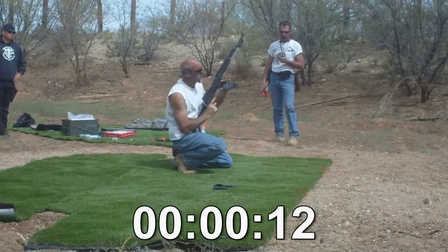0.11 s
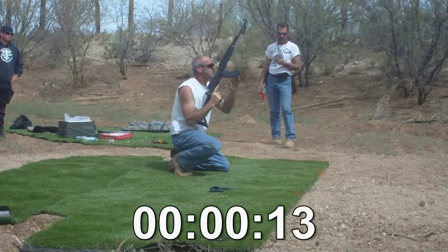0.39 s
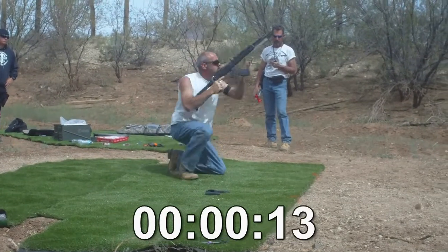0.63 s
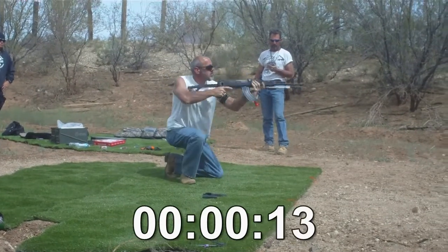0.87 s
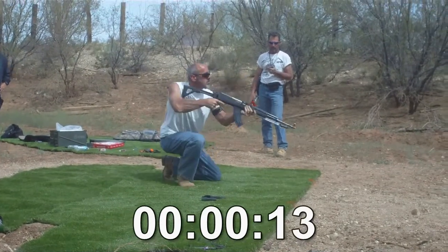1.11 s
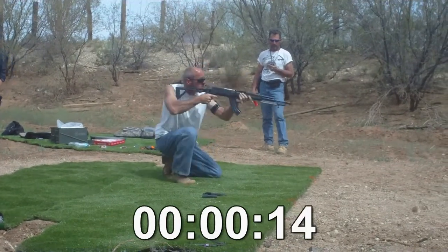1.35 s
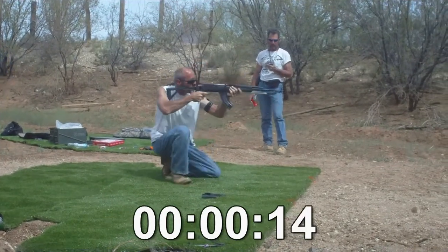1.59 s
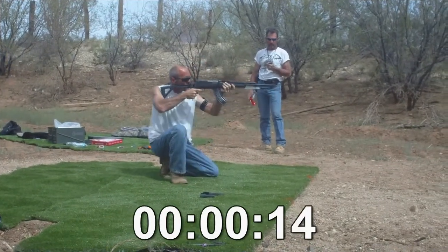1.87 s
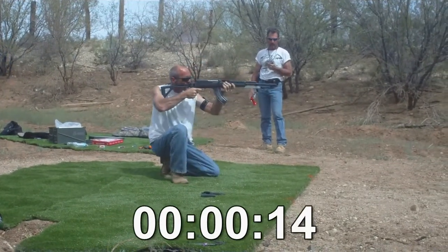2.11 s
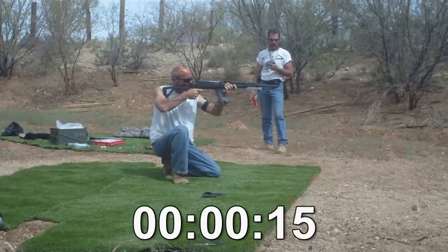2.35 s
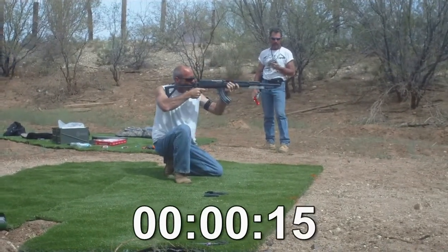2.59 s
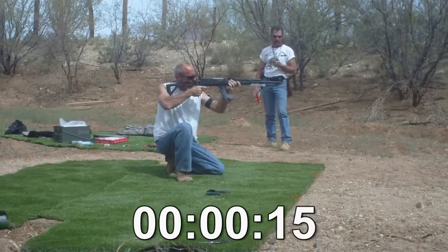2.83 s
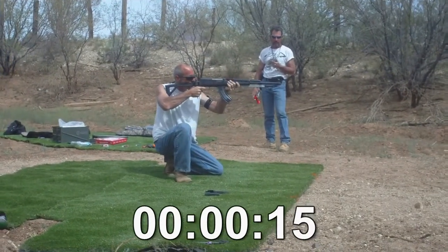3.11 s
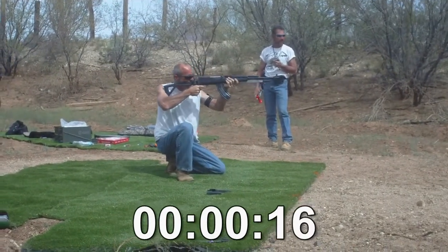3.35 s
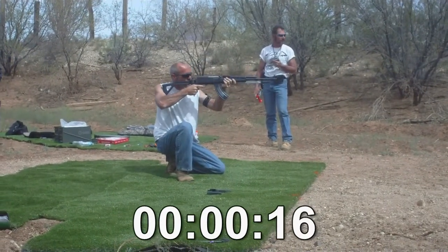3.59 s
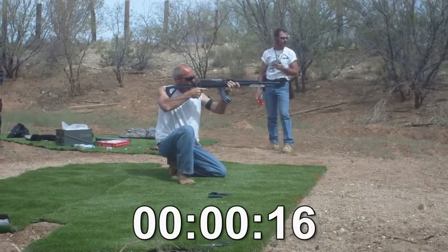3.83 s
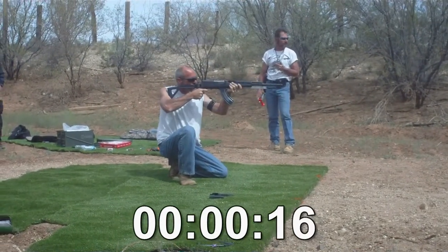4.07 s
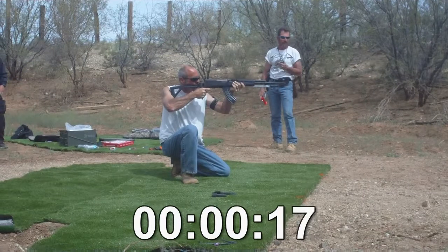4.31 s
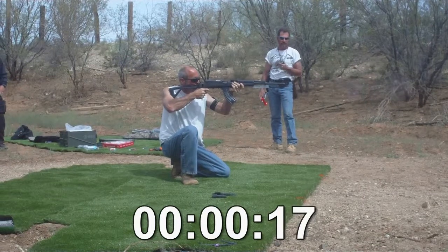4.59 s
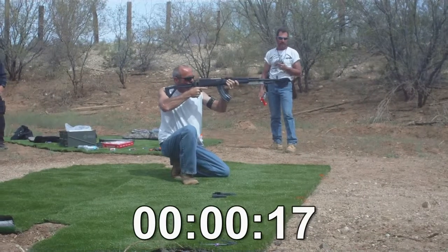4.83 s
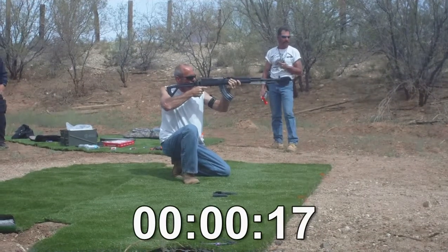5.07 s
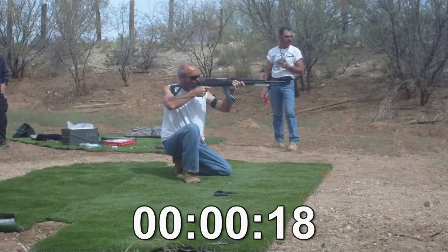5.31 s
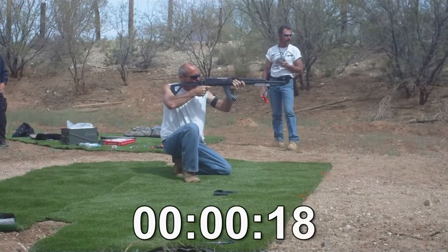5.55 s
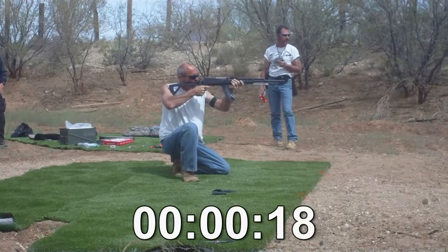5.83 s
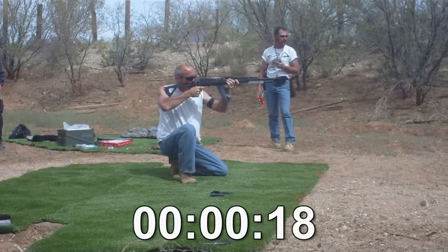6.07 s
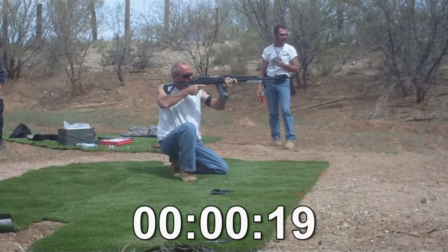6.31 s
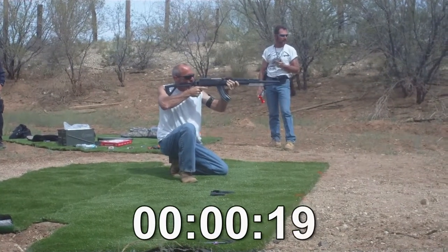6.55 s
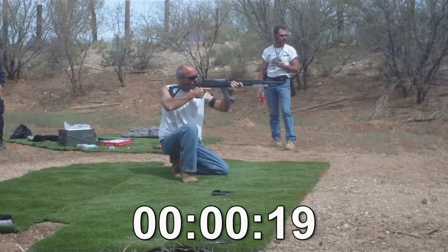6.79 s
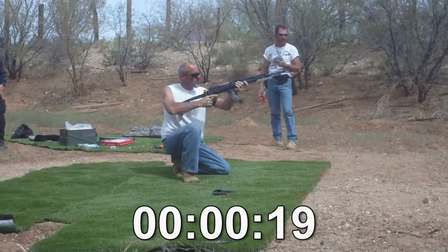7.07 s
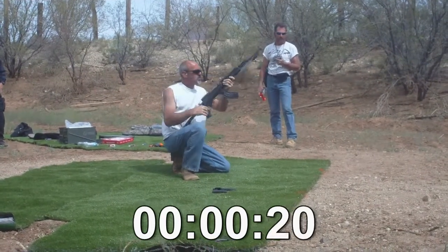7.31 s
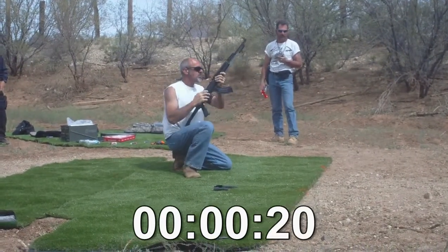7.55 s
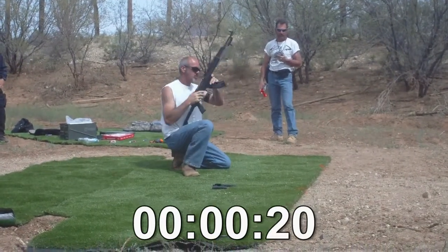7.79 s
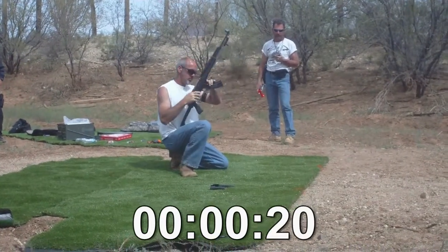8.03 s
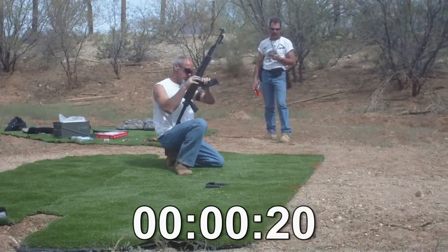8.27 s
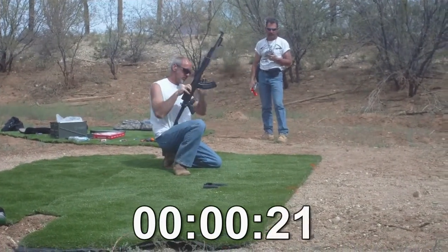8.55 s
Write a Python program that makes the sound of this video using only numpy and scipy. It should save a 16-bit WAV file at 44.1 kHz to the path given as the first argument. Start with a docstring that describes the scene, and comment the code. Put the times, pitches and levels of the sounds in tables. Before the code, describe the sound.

Soft, low outdoor air with a very faint thin cricket near 5 kHz, captured in mono a few metres from the shooter. From 0 to 1.4 s a bird scolds in short, hoarse, buzzing notes; longer rasping, rising calls follow at about 1.7 to 3 s. A light click sounds at 0.1 s, with tiny metal ticks and a faint slide around 0.6 to 0.8 s. Loud rifle shots burst at 3.2, 4.5 and 6.0 s, each abrupt and overloaded, with slapping echoes and scatter fading fast. The background ducks and creeps back. Short bird notes return from 3.9 to 4.5 s; small metal clicks and rattles fall at 5.0 to 5.9 s. After a near-quiet gap, a bright tinging snap comes at 7.3 s, a hollow clunk at 7.8 s, small ticks near 8.0 s, then strong ringing clacks and scraping at 8.3 to 8.65 s.

```python
"""A bird scolds in buzzy notes over soft air and a thin cricket as a rifle is handled; three shots follow, then it is cleared.
Each blast is decaying coloured noise, returned by bushes and banks as scatter and single echo pulses.
Metal parts are noise rattles striking tuned resonators, dense slips and lone pings; the bird is a stack of
blurred harmonics; cricket and air are filtered noise that wavers.
The recorder overloads on each shot, ducks its gain and lets it creep back, over its own low noise."""
import sys
import numpy as np
from scipy import signal
from scipy.io import wavfile
from scipy.ndimage import uniform_filter1d

SR = 44100
rng = np.random.default_rng(int(sys.argv[2]) if len(sys.argv) > 2 else 0)


def invert_db(level):
    """Linear amplitude ratio for a level in decibels (20 dB per decade), elementwise."""
    return 10 ** (np.asarray(level, dtype=float) / 20)


def store_wav(level_fs):
    """Save 16-bit WAV to argv[1]."""
    pcm = np.round(np.clip(np.atleast_2d(level_fs), -1, 1) * 32767)
    wavfile.write(sys.argv[1], SR, pcm.T.astype(np.int16))


N = 381906  # samples

# muzzle blasts: (time [s], relative level [dB])
SHOTS = [(3.2047, 2), (4.5356, 1), (5.956, 1)]
# colour of the scatter: (frequency [Hz], relative density [dB per Hz], extra fall [dB/s])
BLAST_COLOUR = [(50, -30.5, -43), (89.5, -18, -49.5), (170, -2.5, -42), (324, -7, -15), (550, -5.5, 2),
                (1000, -0.5, -1), (1700, -4, 3.5), (2310, -9.5, -8.5), (3691, -6.5, 20.5), (6970, -7, 61.5),
                (10700, -23.5, 69.5), (15000, -27, 88)]
# single echoes of the blast: (delay [s], level before dulling [dB], sign, swing [Hz], dulled above [Hz])
ECHOES = [(.009, 8.5, 1, 200, 2005), (.0325, 11, -1, 600, 3000), (.037, 0.5, 1, 200, 1000),
          (0.038, 10, -1, 2494, 8850), (0.0501, 22.5, -1, 2988, 14000), (0.0503, 14.5, 1, 175, 11990),
          (0.058, 4.5, 1, 248, 1000), (.0715, 0.5, 1, 300, 787.5), (.0985, -4.5, -1, 400, 800),
          (.221, -18.5, -1, 170, 600), (0.2805, -18, 1, 180, 600), (.335, -31, 1, 150, 500)]
# scatter from muzzle, ground, then near thickets:
# (delay [s], level [dB], lift of the body around 1.2 kHz [dB])
BURSTS = [(0, 16, 5.5), (.003, 12, 3), (.0085, 9, 4), (.016, 1, -0.5), (.031, 0, 6), (.034, 4.5, -7.5),
          (.05, 8, -8), (.075, -2.5, 3), (.104, -12, 11)]
BURST_T60_S, BURST_BASS_DB = .035, -4
# near bushes return treble evenly, then thin out; the whole hollow dies away under them
BUSHES_DB, BUSHES_UNTIL_S, BUSHES_FALL_DB_PER_S = -3, .075, 329.5
HOLLOW_DB, HOLLOW_FALL_DB_PER_S = -0.5, 107.5

# sear, hammer and firing pin just ahead of each shot:
# (lead before the blast [s], relative level [dB], loudest at [octaves above 1 kHz], fall one octave away [dB])
LOCK = [(0.012, -41.5, .6, 4), (.0078, -36, 1, 1.5), (.0045, -37, .6, 2), (.0015, -26.5, 1, 2.5)]
# contacts of metal parts and small ticks:
# (time [s], relative level [dB], loudest at [octaves above 1 kHz], fall one octave away [dB])
CLICKS = [(.0728, -48.5, 1.88, 5.5), (.124, -60.5, 4, 5), (0.613, -59, 2.1, 8), (0.665, -60, 1.7, 11),
          (.6923, -60, 2.5, 8), (0.7284, -66, 1.5, -4), (0.762, -60.5, 1, 3), (3.974, -58, 4, 3),
          (4.09, -61, 3.5, 5), (4.986, -40, 2, 3), (5.063, -48, 2.3, 4), (5.157, -48, 1.2, 7),
          (5.24, -52, 1, 8), (5.307, -51, 2, 6), (5.331, -48.5, 3.5, 0.5), (5.451, -56, 1.4, 6),
          (5.613, -58, 3, 1), (5.8549, -39, 4.5, 1.5), (5.877, -49, 2.1, 4), (6.915, -63, 2.5, 4),
          (7.216, -57.5, 1.4, 3), (7.261, -52, 1.7, 9), (7.281, -53, 1.2, 6), (7.311, -54, 1.3, 14),
          (7.327, -33, 4.5, 1.5), (7.351, -48.5, 3.2, 2), (7.568, -58.5, 2.5, .5), (7.773, -32.5, 1, 1.1),
          (7.829, -41, 1.06, 11), (7.949, -56.5, 0.5, 6), (8.005, -63.5, 3, 1), (8.021, -43.5, 3.9, 1),
          (8.041, -51, 1, 11), (8.075, -60, 2, 4), (8.279, -42.5, 2.3, 3.5), (8.338, -46, 2.5, 2),
          (8.347, -26, 2.17, 5.5), (8.399, -40.5, 1.5, 5), (8.411, -34.5, 2.1, 7), (8.464, -50, 1.9, 7),
          (8.53, -58, 2.5, 2), (8.579, -59, .4, 3), (8.593, -30, 2.5, 5), (8.646, -42.5, 2.1, 22)]
# bands of a contact: (low edge [Hz], high edge [Hz], share of ringing [ratio])
CLICK_BANDS = [(800, 1300, 1.6), (1300, 2200, 1.1), (2200, 5000, .3), (5000, 11500, .4)]
RATTLE_T60_S, DEEPEST_FALL_DB = .028, 51
# ringing modes of the rifle's metal: (frequency [Hz], relative level [dB], t60 [s])
RIFLE_MODES = [(990, -5, .065), (1250, -11, .045), (1550, -12, .03), (1770, -12, .05), (2020, -12, .035),
               (2450, -18, .03), (2900, -17, .045), (3500, -20, .03), (4300, -21, .03), (5000, -19, .03),
               (5500, -19, .03), (6280, -14, .04), (6600, -13, .04), (6870, -16, .06), (7700, -18, .03),
               (8450, -17, .04), (9300, -22, .03)]
# single steel parts that ring out: (time [s], level [dB], frequency [Hz], t60 [s])
PINGS = [(.614, -60, 8500, .02), (.693, -57, 8240, 0.017), (.727, -57, 8150, 0.022),
         (0.73, -50.5, 1340, .04), (.762, -50, 8550, 0.016), (3.973, -46, 2800, .028),
         (5.856, -43, 12500, 0.16), (7.331, -22, 12070, 0.11), (7.774, -25, 960, 0.057),
         (7.775, -36, 1764, .05), (7.878, -52, 1700, 0.067), (7.95, -46, 981, .09),
         (8.023, -40, 1760, 0.034), (8.042, -51, 1800, 0.043), (8.042, -54, 1010, .06),
         (8.349, -21, 6460, 0.029), (8.4, -29.5, 6650, 0.038), (8.412, -32, 6500, 0.034),
         (8.415, -46, 970, .09), (8.464, -42.5, 6630, 0.032), (8.594, -40, 996, 0.093)]
# parts sliding and clattering on each other:
# (start [s], length [s], level [dB], sag over the stroke [dB], treble over low [dB])
STROKES = [(.63, 0.18, -69.5, -3, -9), (5.244, 0.057, -58, 4, -3), (5.328, 0.063, -56, 13, 9.5),
           (7.21, .15, -62.5, 8, -4), (7.79, 0.057, -55.5, 4, -5), (7.835, .04, -60, 3, -12),
           (8.344, 0.076, -46.5, 9, 3.5), (8.414, 0.048, -52, 14, 0.5), (8.463, 0.032, -60, 9, 1.5),
           (8.602, 0.073, -50.5, 16, 3)]
STROKE_EDGE_S = 0.0027

# buzzy bird notes: (start [s], length [s], level [dB], throat at start [Hz], throat at end [Hz])
BIRD_NOTES = [(0, 0.044, -65.5, 5440, 5430), (.251, 0.09, -67, 4870, 5170), (0.383, .11, -64.5, 4530, 5000),
              (0.543, .12, -63, 4650, 5370), (0.717, 0.11, -61, 4970, 5360),
              (0.888, .11, -61.5, 4650, 5400), (1.123, .11, -65, 4250, 4630),
              (1.306, 0.11, -66, 4140, 4900), (1.663, .23, -73, 3570, 4300), (1.864, 0.6, -68, 4850, 7540),
              (2.528, .49, -64.5, 4340, 5960), (3.878, .08, -67, 4700, 5700),
              (4.032, 0.095, -65, 4560, 4760), (4.2, .1, -61.5, 4500, 4680), (4.382, .1, -61.5, 4600, 4900)]
LONG_NOTE_S, SHORT_PULSES_HZ, LONG_PULSES_HZ = .2, 222, 277
SWELL_DB, SAG_DB_PER_S2 = 6, 16  # short notes swell to their end, long ones tire and sag ever faster
SCOOP, SCOOP_S, PITCH_SAG_PER_S2 = .07, .035, .2  # notes scoop up into pitch and droop as they tire

CRICKET_HZ, CRICKET_WIDTH_HZ, CRICKET_DB = 5200, 70, -80

# colour of the open air: (frequency [Hz], relative density [dB per Hz])
AIR_COLOUR = [(24, -55), (40, -24.5), (115, -2), (185, -0.5), (297, -5), (345, -2.5), (412, -4),
              (2770, -20.5), (5180, -20.5), (8770, -24), (11300, -36.5), (14800, -30.5), (16000, -47)]
AIR_DB = -63.5
# colour of the recorder's own noise, behind its gain control: (frequency [Hz], relative density [dB per Hz])
RUMBLE_COLOUR = [(40, -22), (75, -3.5), (160, -7), (240, -8), (440, -23.5), (1500, -29), (4500, -36.5),
                 (9000, -39.5), (12000, -56), (16000, -56.5)]
RUMBLE_DB = -69
DUCK_FROM_DB, DUCK_DB, RECOVER_DB_PER_S = -22, 21, 5.5
EDGES_HZ = np.geomspace(40, 16500, 21)  # edges of the noise-colouring bands


def shots():
    """Pressure scatters off the ground alike each shot, so the lows repeat; air stirs the treble anew."""
    t = np.arange(round(.9 * SR)) / SR
    # bushes stand in clumps and single trunks throw back single cracks; far off they blend
    clumps_db = 1.5 * drift(70, len(t)) + 3.0 * drift(450, len(t))
    clumps_db *= .4 + .6 * np.exp(-t / .12)

    def fade(hz):
        """Scatter dies away, with each pitch falling at its own extra pace."""
        return invert_db(scatter_db(t, hz) + clumps_db - at_hz(BLAST_COLOUR, hz, column=2) * t)

    ground = rng.standard_normal((2, len(t)))
    echoes = echo_pulses(t)
    scale = np.std(coloured(ground, BLAST_COLOUR, lambda hz: 1))
    b, a = signal.butter(1, 1500, fs=SR)
    out = np.zeros(N)
    for s, level_db in SHOTS:
        fresh = rng.standard_normal(ground.shape)
        # ground below about 1500 Hz, fresh noise above
        white = fresh + signal.lfilter(b, a, ground - fresh)
        scatter = coloured(white, BLAST_COLOUR, fade) / scale
        add(out, s, invert_db(level_db) * (scatter + echoes))
    return out


def echo_pulses(t):
    """Each echo is a pressure jump, the suction after it and a weak rebound, dulled on its way."""
    echoes = np.zeros(len(t))
    start = t[:2000]
    for delay, level_db, sign, swing_hz, dull_hz in ECHOES:
        pulse = np.cos(2 * np.pi * swing_hz * start) * np.exp(-(1.4 * swing_hz * start) ** 2)
        pulse = signal.lfilter(*signal.butter(1, dull_hz, fs=SR), pulse)
        add(echoes, delay, np.sign(sign) * invert_db(level_db) * pulse)
    return echoes


def scatter_db(t, hz):
    """Bursts, bushes and hollow add in power; bushes give back only treble."""
    power = invert_db(HOLLOW_DB - HOLLOW_FALL_DB_PER_S * t) ** 2
    if hz >= 2200:
        thinning_s = np.maximum(t - BUSHES_UNTIL_S, 0)
        power = power + invert_db(BUSHES_DB - BUSHES_FALL_DB_PER_S * thinning_s) ** 2
    for delay, level_db, body_db in BURSTS:
        if hz < 500:
            lift_db = BURST_BASS_DB + min(body_db, 0)
        elif hz < 2200:
            lift_db = body_db
        else:
            lift_db = 0
        age = np.maximum(t - delay, 0)
        burst = invert_db(level_db + lift_db - 60 * age / BURST_T60_S)
        power = power + (t >= delay) * burst ** 2
    return 10 * np.log10(power)


def handling():
    """Contacts rattle in four noise bands, each striking the metal modes inside it; lone parts ring out."""
    out = np.zeros(N)
    t = np.arange(6000) / SR
    centres = np.log2([np.sqrt(low * high) / 1000 for low, high, _ in CLICK_BANDS])
    lock_clicks = [(s - lead, *rest) for s, _ in SHOTS for lead, *rest in LOCK]
    for s, top_db, octave, fall_db in CLICKS + lock_clicks:
        # weaker away from the loudest pitch
        levels_db = top_db - np.clip(fall_db * (centres - octave) ** 2, 0, DEEPEST_FALL_DB)
        rattle = rng.standard_normal(len(t)) * invert_db(-60 * t / RATTLE_T60_S) * np.minimum(t / 0.001, 1)
        strike = rattle * invert_db(-60 * t / 0.003)
        strengths_db = rng.normal(0, 3.5, len(RIFLE_MODES))  # every contact excites the modes differently
        for (low_hz, high_hz, share), level_db in zip(CLICK_BANDS, levels_db):
            rung = 0
            for (hz, mode_db, t60), strength_db in zip(RIFLE_MODES, strengths_db):
                if low_hz <= hz < high_hz:
                    rung = rung + invert_db(mode_db + strength_db) * ring(strike, hz, t60)
            noise = band(band(rattle, low_hz, high_hz), .8 * low_hz, 16000)
            # balance noise and ringing by their first milliseconds
            sound = noise / np.std(noise[:130]) + share * rung / np.std(rung[:260])
            add(out, s, invert_db(level_db - 1.5) * sound)
    for s, level_db, hz, t60 in PINGS:
        add(out, s, invert_db(level_db) * ring(np.arange(12000) == 0, hz, t60))
    return band(band(out, 700, 17000), 550, 18000)


def slide():
    """Sliding parts make dense uneven slips: grit, and the rifle's modes half drowned in it."""
    is_slip = rng.random(N) < 1500 / SR  # about 1500 slips a second
    slips = is_slip * rng.standard_normal(N) * invert_db(5 * drift(60, N))
    # mode levels are evened out to a quarter of their dB
    rung = sum(invert_db(0.25 * db) * ring(slips, hz, t60) for hz, db, t60 in RIFLE_MODES)
    sound = .9 * rms_one(rung) + rms_one(band(slips, 900, 7900))
    low = rms_one(band(sound, 950, 1900))
    high = rms_one(band(sound, 2200, 9500))
    t, out = np.arange(N) / SR, np.zeros(N)
    for s, length, level_db, sag_db, treble_db in STROKES:
        u = np.clip((t - s) / length, 0, 1)
        edges = np.clip(np.minimum(u, 1 - u) * length / STROKE_EDGE_S, 0, 1)
        out += invert_db(level_db - sag_db * u) * edges * (low + invert_db(treble_db) * high)
    return out


def bird():
    """Uneven pulses give close, blurred harmonics; a wide band passes them and the throat lifts a few."""
    out = np.zeros(N)
    for s, length, level_db, hz0, hz1 in BIRD_NOTES:
        short = length < LONG_NOTE_S
        rate = SHORT_PULSES_HZ if short else LONG_PULSES_HZ
        roughness = 2.0 if short else 1.25  # short notes are hoarser
        flutter_rate = 45 if short else 16
        size = round(length * SR)
        u = np.linspace(0, 1, size)
        glide = 1 - SCOOP * np.exp(-u * length / SCOOP_S) - PITCH_SAG_PER_S2 * (u * length) ** 2
        wobble = .006 * drift(30, size) + .008 * drift(7, size)
        phase = 2 * np.pi * np.cumsum(rate * (glide + wobble)) / SR
        throat = hz0 + (hz1 - hz0) * u
        note = 0
        for k in range(int(3300 / rate), int(8500 / rate)):
            wide = np.exp(-np.abs((k * rate - 2800 - 0.48 * throat) / 1650) ** 4)
            lift = 1 + 0.3 * np.exp(-((k * rate - throat) / 450) ** 2)
            blur = roughness * drift(170, size)
            flutter = invert_db(4.0 * drift(flutter_rate, size))
            note = note + wide * lift * flutter * np.sin(k * phase + blur)
        edges = np.clip(np.minimum(u, 1 - u) * length / .015, 0, 1)
        shape_db = SWELL_DB * (u - .5) if short else -SAG_DB_PER_S2 * (u * length) ** 2
        add(out, s, invert_db(level_db + shape_db) * edges * rms_one(note))
    return out


def cricket():
    """The song is a narrow band of noise that throbs unevenly."""
    half = CRICKET_WIDTH_HZ / 2
    song = band(rng.standard_normal(N), CRICKET_HZ - half, CRICKET_HZ + half)
    return invert_db(CRICKET_DB + 3.0 * drift(15, N)) * rms_one(song)


def air():
    """Outdoor air is coloured noise, gently patchy from band to band."""
    return wavering_noise(AIR_COLOUR, AIR_DB, patchy_db=2.0)


def wavering_noise(spectrum, level_db, patchy_db):
    """Lasting noise whose bands waver on their own."""
    noise = coloured(rng.standard_normal((2, N)), spectrum, lambda hz: invert_db(patchy_db * drift(6.0, N)))
    return invert_db(level_db) * rms_one(noise)


def coloured(white, spectrum, gain):
    """Bands just under half an octave wide, of two noises in turn; gain(hz) shapes each in time."""
    out = 0
    for k, (low_hz, high_hz) in enumerate(zip(EDGES_HZ, EDGES_HZ[1:])):
        centre_hz = np.sqrt(low_hz * high_hz)
        level = invert_db(at_hz(spectrum, centre_hz))
        out = out + level * band(white[k % 2], low_hz, high_hz) * gain(centre_hz)
    return out


def ring(x, hz, t60):
    """A two-pole resonator: a unit click sets a sine of height 1 ringing."""
    r, w = invert_db(-60 / (t60 * SR)), 2 * np.pi * hz / SR
    return signal.lfilter([0, np.sin(w)], [1, -2 * r * np.cos(w), r * r], x + 1e-18)


def drift(rate, size):
    """Slow random wander through normal steps of spread 1, rate steps a second."""
    steps = rng.standard_normal(int(size / SR * rate) + 2)
    return np.interp(np.arange(size) / SR * rate, np.arange(len(steps)), steps)


def band(x, low_hz, high_hz):
    """Butterworth band-pass."""
    return signal.sosfilt(signal.butter(2, [low_hz, high_hz], "band", fs=SR, output="sos"), x)


def at_hz(table, hz, column=1):
    """Reads a table column at a frequency, along log frequency."""
    table = np.array(table)
    return np.interp(np.log(hz), np.log(table[:, 0]), table[:, column])


def rms_one(x):
    """Scales a sound to an rms of 1."""
    return x / np.sqrt(np.mean(x ** 2) + 1e-20)


def add(out, s, sound):
    """Mixes a sound in at s seconds."""
    i = round(s * SR)
    out[i:i + len(sound)] += sound[:len(out) - i]


def scene():
    """Mixes all sources to one channel."""
    mix = shots() + handling() + slide() + bird() + cricket() + air()
    return mix[None]


def top_cut(x):
    """Nothing passes above the cut-off."""
    return signal.sosfilt(signal.butter(12, 16640, fs=SR, output="sos"), x)


def record(dry):
    """Gain ducks within milliseconds and recovers slowly; what gets through first is clipped."""
    level_db = 10 * np.log10(uniform_filter1d(dry ** 2, size=128, origin=63) + 1e-12)
    # hold the deepest duck so far, let down by a steady ramp
    ramp = RECOVER_DB_PER_S * np.arange(N) / SR
    wanted_db = np.clip(level_db - DUCK_FROM_DB, 0, DUCK_DB)
    duck_db = np.maximum.accumulate(wanted_db + ramp, axis=1) - ramp
    r = np.exp(-1 / (0.00053 * SR))  # the gain moves with a 0.53 ms time constant
    x = dry * invert_db(-signal.lfilter([1 - r], [1, -r], duck_db))
    x = x - 0.88 * band(x, 9200, 14000)  # a dip near 11 kHz
    top = .53  # overload ceiling, full scale = 1
    x = x / (1 + np.abs(x / top) ** 6) ** (1 / 6)
    x = signal.sosfilt(signal.butter(2, 70, "high", fs=SR, output="sos"), x)
    x = x + wavering_noise(RUMBLE_COLOUR, RUMBLE_DB, patchy_db=2.2)
    x = signal.sosfilt(signal.cheby2(10, 50, 16400, fs=SR, output="sos"), x)
    return top_cut(x)


dry = scene()
out = record(dry)
store_wav(out)
```